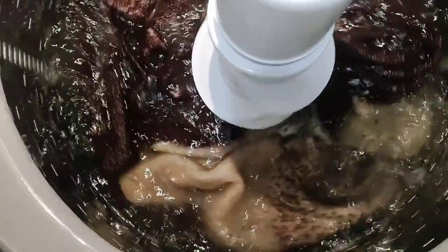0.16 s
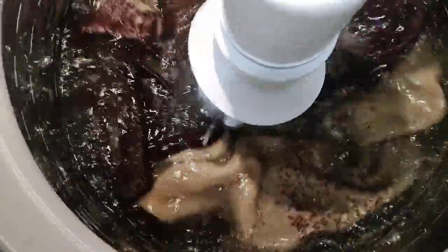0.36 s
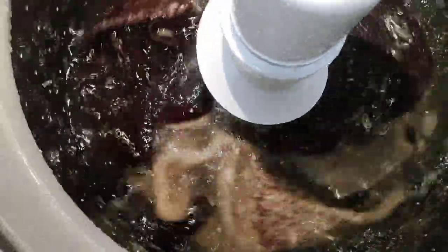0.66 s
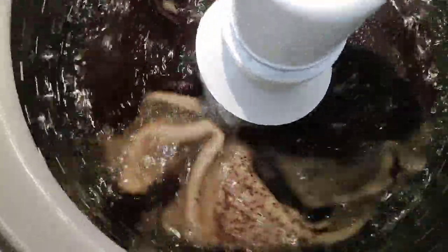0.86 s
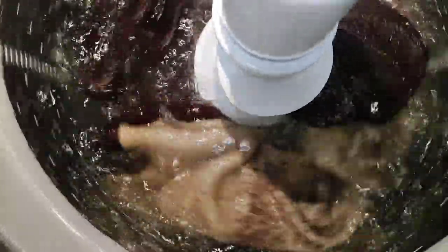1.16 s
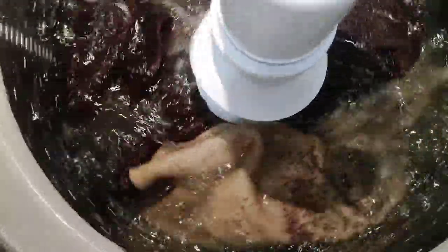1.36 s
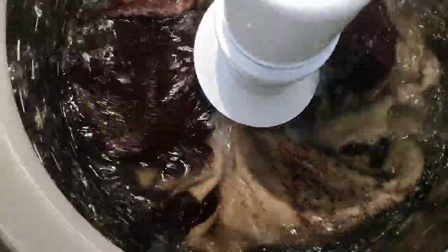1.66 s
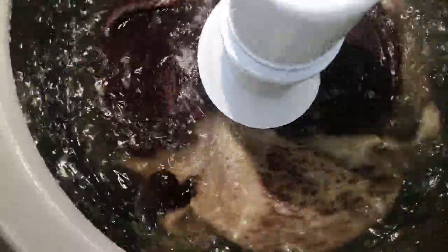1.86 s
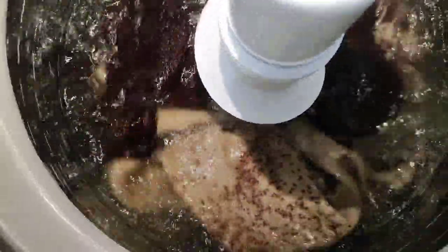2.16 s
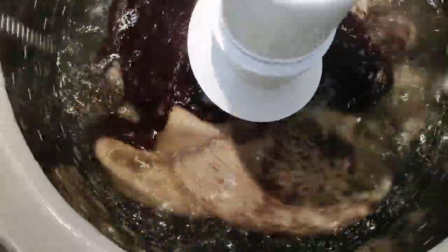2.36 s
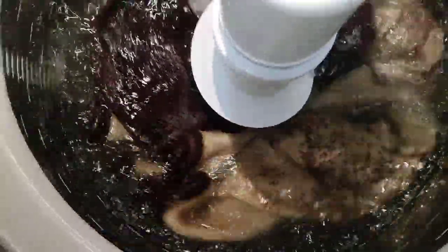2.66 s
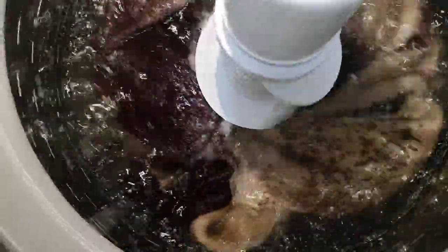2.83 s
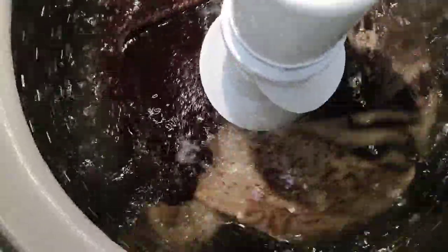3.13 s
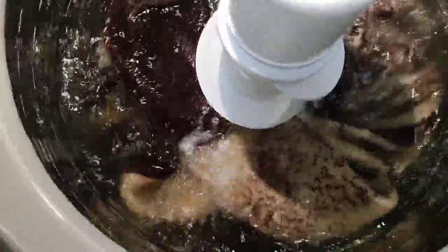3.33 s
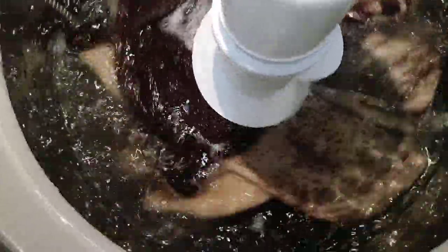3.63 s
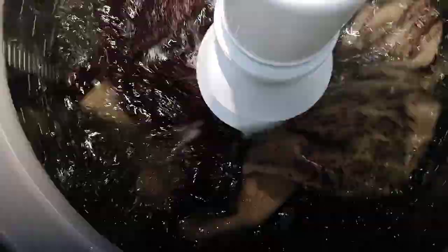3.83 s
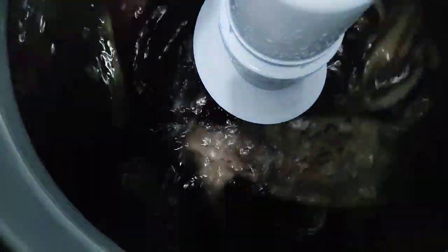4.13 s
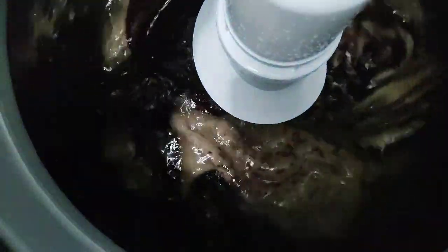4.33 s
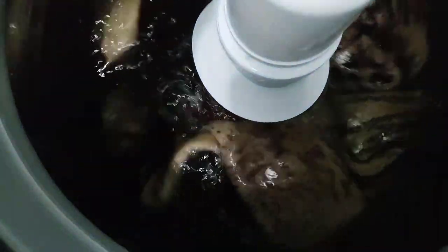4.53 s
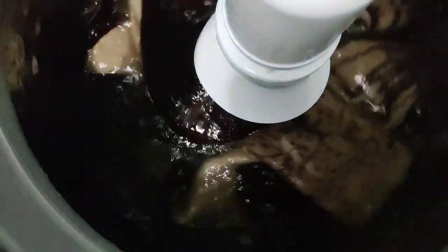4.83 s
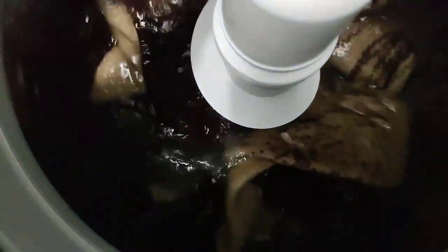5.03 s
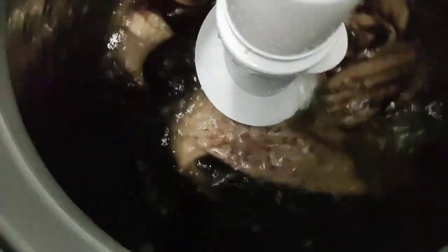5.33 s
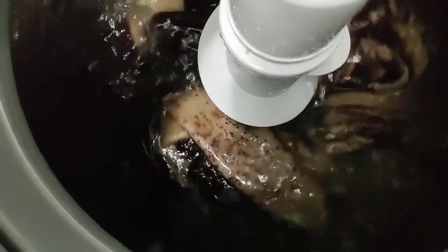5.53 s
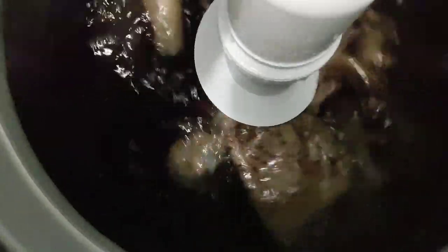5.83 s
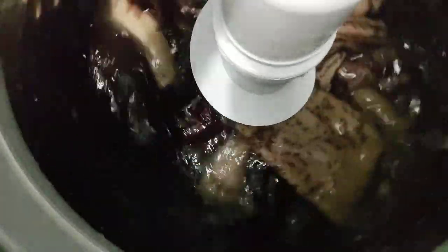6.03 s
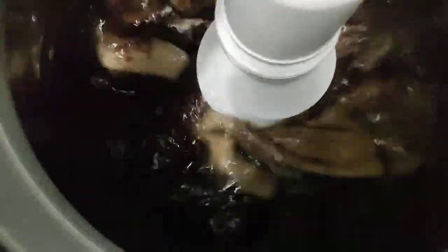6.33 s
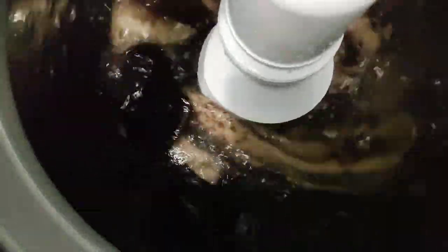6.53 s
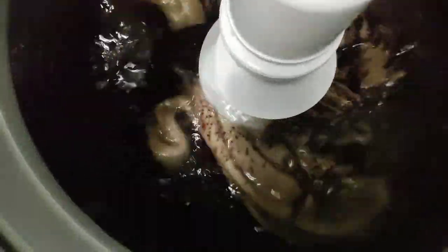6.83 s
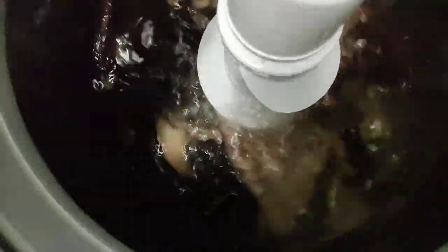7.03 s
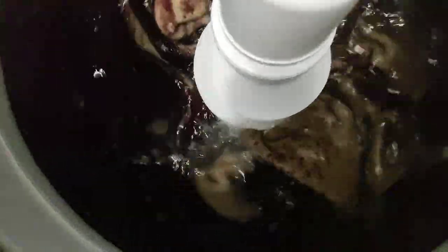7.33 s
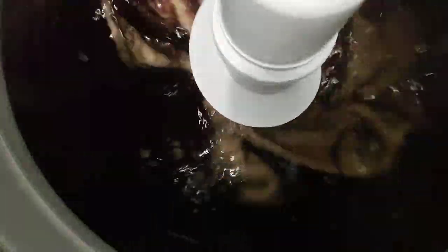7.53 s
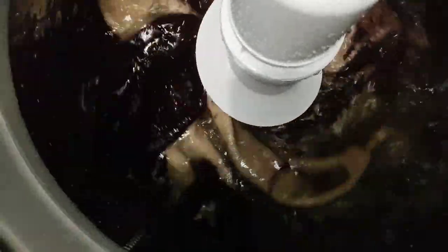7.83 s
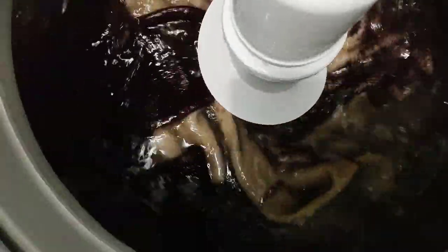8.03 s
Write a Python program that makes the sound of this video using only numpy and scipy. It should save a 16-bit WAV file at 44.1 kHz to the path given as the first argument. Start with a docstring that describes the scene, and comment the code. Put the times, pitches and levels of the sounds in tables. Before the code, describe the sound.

A top-loading washer agitates heavy wet cloth, its motor humming in short back-and-forth bursts with soft knocks, sloshing water and bubbling.

```python
"""A soft knock of the drive over churning water, then the motor: a top-loading washer agitates a load,
heard from just above the open tub in a small room. Every 0.6 s the motor spins up one way, power cuts
and it coasts, then it reverses. Gear tones follow the mesh rate; noise impacts excite tub, motor and panel
resonances; knocks and clunks are decaying modes; the water is filtered impacts and ringing bubbles."""
import sys
import numpy as np
from scipy import signal
from scipy.fft import rfft, irfft, next_fast_len
from scipy.io import wavfile
from scipy.ndimage import uniform_filter1d

SR = 44100
rng = np.random.default_rng(int(sys.argv[2]) if len(sys.argv) > 2 else 0)


def dump_mix(stems):
    """Bounce the given channels to the path in sys.argv[1] as a 16-bit WAV at rate SR."""
    frames = np.atleast_2d(stems).T  # one column per channel
    limited = np.clip(frames, -1, 1)  # hard clip at full scale
    pcm = np.round(limited * 32767).astype(np.int16)
    wavfile.write(sys.argv[1], SR, pcm)


N = 361179
T = np.arange(N) / SR
FREQ = np.fft.rfftfreq(N, 1 / SR)

# Motor strokes, alternately forward and back. Each row: time power cuts in seconds, hum level in dB,
# whine level in dB, phase of the whine between the ears in radians, weight of the load on the tub in dB,
# liveliness of the water in dB, run-on of the load while coasting in dB.
STROKES = [(.488, -30, -34.5, 2.75, -2, -1.1, 0.5), (1.09, -32, -40, 1.86, -1, -0.5, -2.5),
           (1.689, -30, -33.5, 2.96, -1, -1, 2.5), (2.29, -33.5, -39.5, 2.25, -1.5, -2.5, -3),
           (2.889, -30.5, -32.5, 2.74, -1.5, -0.5, -1), (3.49, -32, -43, 2.46, 0, -4.5, -2.5),
           (4.088, -29.5, -32.5, 2.686, 0.5, 0, -1.5), (4.69, -31, -40, 2.13, -0.5, 0, -5.5),
           (5.29, -30.5, -35.5, 2.73, 1, 1.5, 1), (5.89, -32, -41, 2.2, 0.4, 2, -3.5),
           (6.49, -31, -36.5, 2.9, -1, 3, 0), (7.09, -33, -44, 2.38, -3, 0, -1),
           (7.691, -33, -36, 2.23, -2, 2.5, 0), (8.29, -35, -39.5, 2.13, -4, 3, 0)]
STROKE_S, POWER_S = .6, .38  # length of a stroke, and of its powered part
# the motor spins up, the agitator grips the load, the drive lets go, and all brakes to rest
SPIN_UP_S, LET_GO_S, BRAKE_S = 0.1, 0.38, 0.051


def undb(db):
    """A level in decibels is the logarithm of an amplitude gain; this inverts it."""
    return 10 ** (np.asarray(db) / 20)


def unit(x):
    """Normalise the mean power, so that the rms is 1."""
    return x / np.sqrt(np.mean(x ** 2))


def follow(table, at):
    """Linear interpolation of every column against the first."""
    s, *columns = np.transpose(table)
    return [np.interp(at, s, c) for c in columns]


def ramp(age, start_s, length_s):
    """Linear rise from 0 to 1."""
    return np.clip((age - start_s) / length_s, 0, 1)


def walk(rate):
    """Band-limited random wander with a spread near 1, from `rate` new values a second."""
    hold = int(SR / rate)
    steps = np.repeat(rng.standard_normal(N // hold + 1), hold)
    return 1.25 * uniform_filter1d(steps, hold)[:N]


def shape(x, gain):
    """Linear filtering: multiply the spectrum by a gain at each frequency."""
    size = next_fast_len(N + 8192)
    gain = np.interp(np.fft.rfftfreq(size, 1 / SR), FREQ, gain)
    return irfft(rfft(x, size) * gain, size)[..., :N]


def colour(x, points):
    """Spectral colouring by (Hz, dB) points joined on a logarithmic frequency axis."""
    hz, db = np.transpose(points)
    return shape(x, undb(np.interp(np.log(FREQ + 1), np.log(hz), db)))


def patter(rate, spread_db):
    """Shot noise: two independent streams of tiny uneven impacts, `rate` a second in each."""
    hits = rng.random((2, N)) < rate / SR
    sizes = undb(spread_db * np.minimum(rng.exponential(size=(2, N)), 4))
    return unit(hits * sizes * rng.standard_normal((2, N)))


def body(push, modes):
    """Modal resonance: some modes move the air alike at both ears, some in opposite phase."""
    hz, width, mid_db, side_db = np.transpose(modes)[:, :, None]
    grid = FREQ[1::8]
    # steep skirts: the power response is a squared resonance curve
    power = 1 / (1 + (hz / width * (grid / hz - hz / grid) * .7) ** 2) ** 2

    def ring(stream, db):
        """Filter one stream by the summed power of the modes."""
        gain = np.sqrt(np.sum(power * undb(db) ** 2, axis=0))
        return shape(stream, np.interp(FREQ, grid, gain))

    mid, side = ring(push[0], mid_db), ring(push[1], side_db)
    return np.array([mid + side, mid - side]) / np.std(mid)


def stroke_clock():
    """Periodic drive: the stroke running and the time since its power came on, already at work at 0 s."""
    starts = np.array(STROKES)[:, 0] - POWER_S
    stroke = np.searchsorted(starts, T) - 1
    start = np.where(stroke < 0, starts[0] - STROKE_S, starts[stroke])
    return stroke, np.clip(T - start, 0, STROKE_S)


def swell(stroke, age, **rule):
    """Load envelope in dB: run up, take the load, build while driven, drop when let go, fade and stop.

    Rule names end in _s for seconds, _db for dB, _db_per_s for dB per second; a pair is forward, back.
    """
    r = {name: np.resize(value, 2)[stroke % 2] for name, value in rule.items()}
    run_on_db = np.array(STROKES)[stroke, 6]
    full_s, coast_s = r["grip_s"] + r["attack_s"], LET_GO_S + r["release_s"]
    driving = r["driven_db"] + r["build_db"] * ramp(age, full_s, LET_GO_S - full_s)
    fade_db = r["fade_db_per_s"] * np.maximum(age - coast_s, 0)
    coasting = np.maximum(r["coast_db"] + run_on_db - fade_db, r["rest_db"])
    stages = ((0, SPIN_UP_S, r["runup_db"]), (r["grip_s"], r["attack_s"], driving),
              (LET_GO_S, r["release_s"], coasting), (STROKE_S - BRAKE_S, BRAKE_S, r["rest_db"]))
    db = r["rest_db"]
    for start_s, length_s, goal in stages:
        db = db + (goal - db) * ramp(age, start_s, length_s)
    return db


def drum_echo(x, t60, wet_db):
    """Reverberation: the steel basket and the room smear a sound with an exponentially decaying tail."""
    t = T[:SR // 3]
    tail = rng.standard_normal((2, len(t))) * undb(-60 * t / t60)
    tail /= np.sqrt(np.sum(tail ** 2, axis=1, keepdims=True))
    wet = signal.fftconvolve(x, tail, axes=1)[:, :N]
    return (x + undb(wet_db) * wet) / np.hypot(1, undb(wet_db))


def bubble(hz, side, cycles=14, rise=0.07):
    """Volume resonance of trapped air, rising in pitch near the surface; the nearer ear leads and is louder."""
    ears_s = .0005  # travel time between the two ears, heard as a phase lead
    t = T[:int(3 * cycles / hz * SR)]
    age = t * hz / cycles
    lead_s = ears_s * (side - .5) * np.array([[1], [-1]])
    envelope = np.exp(-2 * age) * (1 - np.exp(-20 * age))
    ring = envelope * np.sin(2 * np.pi * hz * (t * (1 + rise * np.minimum(age, 2)) + lead_s))
    return np.sqrt([[side], [1 - side]]) * ring


def swarm(times, pitches, gains, sides, cycles, size=N):
    """Superposition of many bubbles, each at its own time, pitch, strength and place."""
    out = np.zeros((2, size + SR))
    for s, hz, gain, side in zip(times, np.clip(pitches, 200, SR / 3), gains, sides):
        ring, i = bubble(hz, side, cycles), min(int(s * SR), size)
        out[:, i:i + ring.shape[1]] += gain * ring
    return out[:, :size]


def churn(x, patchy_db, rate):
    """Independent band modulation: each third of an octave swells by itself."""
    place = 3 * np.log2(np.clip(FREQ, 1000, 8000) / 1000)
    bands = (shape(x, np.maximum(1 - np.abs(place - k), 0)) * undb(patchy_db * walk(rate)) for k in range(10))
    return unit(sum(bands))


def quiet_room():
    """Stationary background noise, partly coherent between the ears."""
    # Spectrum of the quiet room. Each row: frequency in Hz, relative level in dB per Hz.
    room_points = [(20, -11.5), (38, 4.5), (55, -7), (90, 1), (160, 3), (300, 1), (700, -11.5),
                   (1500, -21.5), (3000, -31), (10000, -33), (13000, -49.5)]
    noise = rng.standard_normal(N) + 0.7 * rng.standard_normal((2, N))
    return unit(colour(noise, room_points)) * undb(-65.0)


def knocks(push_s=0.0078, bend_per_s=1.2):
    """Modal impact: slack in the drive closes with a soft push; the ring bends upward as it dies."""
    # Knocks while coasting. Each row: time in seconds, peak level in dB, nominal pitch in Hz.
    coasting_blows = [(0.004, -28.5, 312), (0.511, -29, 344), (0.611, -36.5, 304.3), (1.224, -31, 348),
                      (1.705, -29, 301.3), (1.737, -30, 324), (1.778, -32, 311), (1.809, -35.5, 303),
                      (2.419, -43.5, 354), (2.904, -32, 377), (3.023, -41.5, 345), (3.505, -33, 305),
                      (3.613, -35.5, 293), (4.216, -33, 300.2), (4.337, -42, 283), (4.811, -33.5, 320.6),
                      (5.326, -27.5, 314), (5.358, -37, 424.6), (5.41, -46, 459), (5.433, -31.5, 338),
                      (5.533, -40, 317), (6.028, -36, 319.3), (6.095, -39, 360), (6.551, -32, 311),
                      (6.577, -36.5, 440), (6.625, -29, 329.5), (7.186, -39, 325), (7.206, -32.5, 340),
                      (7.81, -31, 303)]
    # Slack closing as each stroke starts: seconds since power on, peak level in dB, nominal pitch in Hz.
    delay_s, take_up_db, take_up_hz = (.015, -52, 360)
    # Ringing modes. Each row: multiple of the knock's pitch, t60 in seconds, relative level in dB.
    knock_modes = [(.75, 0.11, -16.5), (.93, 0.061, -9.5), (1, 0.095, 1.5), (1.099, 0.071, -15.5),
                   (1.38, 0.12, -19.5)]
    t = T[:SR // 4]
    bent = t * (1 + bend_per_s * (t / 2 - 2 * push_s))
    out = np.zeros(N + len(t))
    blows = list(coasting_blows) + [(s - POWER_S + delay_s, take_up_db, take_up_hz) for s, *_ in STROKES]
    detunes = rng.standard_normal((len(blows), len(knock_modes)))
    for (s, db, hz), detune in zip(blows, detunes):
        ring = np.zeros(len(t))
        for (ratio, t60, mode_db), d in zip(knock_modes, detune):
            ring += undb(mode_db - 60 * t / t60) * np.sin(2 * np.pi * hz * ratio * (1 + 0.017 * d) * bent)
        ring *= 1 - np.exp(-(t / push_s) ** 2)
        i = max(int(s * SR), 0)
        out[i:i + len(t)] += ring / np.abs(ring).max() * undb(db)
    return out[:N]


def tub(stroke, age, load_db):
    """Forced modal response: impacts ring the tub in a low rumble and a boom that grow with the load."""
    # Resonances of the tub, low and booming. Each row: frequency in Hz, approximate width in Hz,
    # relative level in dB in phase at both ears, relative level in dB in opposite phase.
    low_modes = [(78, 11, -1, -12), (94.4, 4.9, 5, -13.5), (120.4, 28, -1, -19.5), (154.7, 11, 2, -10),
                 (207, 36, -5.5, -24.5)]
    boom_modes = [(235.7, 13, 6, -8.5), (284.6, 28, 6, -5), (313.6, 15, 11, -4.5), (345.3, 37, 7.5, 1),
                  (439, 70, -8, -2.5), (442.7, 28, 3, -9.5)]
    # Levels of rumble and boom through a stroke; names and units as in swell.
    rumble_rule = dict(rest_db=-59.5, runup_db=(-53.5, -59),
                   grip_s=0.091, attack_s=0.1, driven_db=(-52.5, -45.5), build_db=(1.5, -0.5),
                   release_s=0.13, coast_db=(-53.5, -49.5), fade_db_per_s=17.5)
    boom_rule = dict(rest_db=-65, runup_db=(-53.5, -57),
                 grip_s=0.11, attack_s=0.06, driven_db=(-46.5, -46.5),
                 build_db=3.5, release_s=0.11, coast_db=(-50.5, -50), fade_db_per_s=32)
    rumble = body(patter(2500, 0.97), low_modes) * undb(swell(stroke, age, **rumble_rule) + load_db)
    boom = body(patter(2500, 0.7), boom_modes) * undb(swell(stroke, age, **boom_rule) + load_db + 5.0)
    return rumble + boom


def panel_rattle(stroke, age, mesh_hz, lively_db):
    """Amplitude-modulated modal noise: the panels chatter at half the mesh rate."""
    # Resonances of the panels. Each row: frequency in Hz, approximate width in Hz,
    # relative level in dB in phase at both ears, relative level in dB in opposite phase.
    panel_modes = [(645, 89, 5, -3.5), (813, 130, 2.5, 7.5), (987.6, 19, 6.5, 6.5), (1072, 95, 1.5, 4.5),
                   (1268, 79, 3, -3), (1405, 270, -5, -10.5), (1461, 160, -3, -9.5), (1710, 87, -5.5, -8.5),
                   (1930, 510, -13, -12)]
    # Relative level of the rattle through a stroke; names and units as in swell.
    rattle_rule = dict(rest_db=-71.5, runup_db=-65.5, grip_s=0.1, attack_s=(0.082, 0.074),
                   driven_db=(-50.5, -51.5), build_db=0.5, release_s=0.077, coast_db=(-57, -54.5),
                   fade_db_per_s=(25.5, 41))
    buzz = unit(1 + .1 * np.cos(np.pi * np.cumsum(mesh_hz) / SR))
    rattle = churn(body(patter(4000, 0.86), panel_modes), patchy_db=1.8, rate=30)
    return rattle * buzz * undb(swell(stroke, age, **rattle_rule) + 0.34 * lively_db + 4.0)


def motor_strain(stroke, age):
    """Noise-driven resonance of the motor, rising and falling with its load."""
    # Resonances of the motor. Each row: frequency in Hz, approximate width in Hz,
    # relative level in dB in phase at both ears, relative level in dB in opposite phase.
    motor_modes = [(540, 61, -11, -1.5), (572, 20, -8, -10.5), (617.5, 14, -6.5, -9),
                   (652, 38, -16.5, -14.5), (809.4, 26, -11.5, -6.5)]
    # Relative level of the strain through a stroke; names and units as in swell.
    strain_rule = dict(rest_db=-26, runup_db=(-4.5, -7.5),
                   grip_s=0.15, attack_s=0.068, driven_db=-3.5, build_db=-3, release_s=0.0085, coast_db=2, fade_db_per_s=175.5)
    back_cut_db = 1.1 * (stroke % 2)
    level_db = swell(stroke, age, **strain_rule) - 46.0 - back_cut_db
    return body(patter(4000, 0.92), motor_modes) * undb(level_db)


def gears(stroke, age, mesh_hz, effort_db, throb_hz=28.56, early_throb=(.85, .35), late_throb=(.3, .2),
          settle_s=0.2, stray=0.63, waver=.005, whine_rough=0.4, whine_ratio=2.012):
    """Gear-mesh harmonics throb as the shaft turns; the motor groans as it pulls, and whines near the octave."""
    # Gear tones. Each row: multiple of the mesh rate, forward and backward level in dB relative to the hum,
    # phase between the ears in radians, roughness from 0 to 1.
    gear_tones = [(.5, -29.5, -22, 0.29, .3), (.75, -30.5, -21.5, 0.48, 0.2), (1, 0.7, -0.5, 0.015, 0.13),
                  (2.5, -19.5, -18, 1.5, 0.1), (3.5, -32, -31, 1.8, 0.4), (4, -35, -27.5, 1.4, 0.2),
                  (4.75, -37.5, -31, 1.3, 0.1), (5.5, -41.5, -34, 1.8, .35)]
    # Groan of the motor pulling up to speed: multiple of the mesh rate, level in dB before the effort is
    # added, phase between the ears in radians, roughness from 0 to 1.
    groan_multiple, groan_db, groan_spread, groan_rough = (2.5, -53.5, 1.43, 0.65)
    # Load on the gears, overshooting as the cloth is gripped, slackening and building again, by direction.
    # Each row: seconds since power on, level in dB relative to the stroke's hum.
    load_forward = [(0, -30.5), (.12, -26.5), (.172, -20.5), (.193, -5), (.228, -2.5), (.27, 2), (.298, -1),
                    (.328, 3.5), (.36, 4.5), (.375, 4), (.386, -12), (.55, -39.5)]
    load_back = [(0, -42), (.12, -24.5), (.16, -18.5), (.18, -7.5), (.226, -1.5), (.262, 1.5), (.298, -1),
                 (.325, -2), (.352, 3.5), (.376, -0.5), (.391, -16.5), (.55, -41.5)]
    # Level of the whine through a stroke, relative to the stroke's own; names and units as in swell.
    whine_rule = dict(rest_db=-40.5, runup_db=-14.5, grip_s=(0.18, 0.15), attack_s=(0.061, 0.068),
                  driven_db=-1, build_db=1.5, release_s=0.0086, coast_db=-12, fade_db_per_s=196.5)
    backward = stroke % 2
    _, hum_db, whine_db, spread_whine, *_ = np.array(STROKES)[stroke].T
    hum_db = hum_db + np.where(backward, follow(load_back, age)[0], follow(load_forward, age)[0])
    whine_db = whine_db + swell(stroke, age, **whine_rule)

    phase = 2 * np.pi * np.cumsum(mesh_hz * (1 + waver * walk(40))) / SR
    since_crest = age - POWER_S + .011
    early, late = np.array(early_throb)[backward], np.array(late_throb)[backward]
    depth = early + (late - early) * ramp(age, 0.22, settle_s)
    shaft_phase = 2 * np.pi * throb_hz * since_crest + stray * walk(18)
    shaft = np.sqrt(1 + depth * np.cos(shaft_phase))  # broad crests, narrow dips

    def tone(multiple, spread, rough):
        """Interaural phase: one wavering partial reaches the two ears out of step."""
        chatter = 1 + rough * (walk(70) + 1j * walk(70))
        ears = np.exp(.5j * spread * np.array([[-1], [1]]))
        return np.sqrt(2) * np.real(chatter * np.exp(1j * multiple * phase) * ears)

    hum = 0
    for multiple, forward_db, back_db, spread, rough in gear_tones:
        hum = hum + tone(multiple, spread, rough) * undb(np.where(backward, back_db, forward_db))
    whine = tone(whine_ratio, spread_whine, whine_rough) * undb(whine_db)
    groan = tone(groan_multiple, groan_spread, groan_rough) * undb(groan_db + effort_db)
    return hum * shaft * undb(hum_db) + drum_echo(whine + groan, t60=0.23, wet_db=-18)


def lapping(rate=65, decay_s=.007, spread_db=10, steady=0.49):
    """Shot-noise envelope: wavelets break one after another and die away, over a steady wash."""
    breaks = (rng.random(N) < rate / SR) * undb(spread_db * rng.random(N)) ** 2
    power = signal.lfilter([1], [1, -np.exp(-1 / (decay_s * SR))], breaks)
    return unit(np.sqrt(steady + power / power.mean()))


def slosh(slosh_db):
    """Cavity noise: cavities open and close in the water, colouring many small impacts."""
    # Spectrum of the slosh. Each row: frequency in Hz, relative level in dB per Hz.
    slosh_points = [(700, -17), (1500, 0.5), (2000, 5), (2600, 3.5), (3200, -5.5), (3900, -7.5),
                    (4800, -19.5), (8000, -37.5)]
    water = churn(colour(patter(4500, 4.1), slosh_points), patchy_db=3.0, rate=24)
    return water * lapping() * undb(slosh_db + 4.5)


def droplets(low_hz=2700, high_hz=11000, spread_db=16, cycles=9, count=3000):
    """Discrete resonances: single drops tick on the water, each with its own pitch."""
    when, radius, size, side = rng.random((count, 4)).T
    hz = low_hz * (high_hz / low_hz) ** radius
    return unit(swarm(when * N / SR, hz, undb(spread_db * size ** 2), side, cycles))


def spray(slosh_db, lively_db):
    """Impact noise of fine drops that never stops; the harder the water sloshes, the more it sprays."""
    # Spectrum of the spray. Each row: frequency in Hz, relative level in dB per Hz.
    spray_points = [(2500, -16), (4000, 3), (5600, -0.5), (7000, -2), (10000, -1.5), (12000, -8.5),
                    (15000, -26.5)]
    base_db, share_db = -85.5, -19  # steady spray; extra spray relative to the slosh
    throw = undb(base_db + .6 * lively_db) + undb(slosh_db + share_db)
    mist = unit(colour(patter(7400, 4.5), spray_points))
    return (mist + droplets() * undb(-5.0)) * throw


def bubbles(slosh_db, lively_db, low_hz=900, high_hz=3100, spread_db=18, cycles=14, count=1700):
    """Bubble resonance: single bubbles of all sizes keep bursting, more strongly as the water sloshes."""
    base_db, share_db = -75, 3.5  # steady bubbles; extra bubbles relative to the slosh
    when, radius, size, side = rng.random((count, 4)).T
    hz = low_hz * (high_hz / low_hz) ** radius
    gains = undb(spread_db * size) * low_hz / hz
    bursts = unit(swarm(when * N / SR, hz, gains, side, cycles))
    return bursts * np.hypot(undb(base_db + lively_db), undb(slosh_db + share_db))


def motor_effort(stroke, age):
    """Starting torque: relative level in dB of the groan and of the shaking it gives the cabinet."""
    # Effort of the motor. Each row: seconds since power on, forward and backward relative level in dB.
    effort_points = [(0, -38.5, -43), (.055, -20, -28.5), (.09, -5, -12.5), (.15, 2.5, 2), (.19, -6, -4),
                     (.25, -30, -30.5), (.6, -62.5, -62)]
    forward, back = follow(effort_points, age)
    return np.where(stroke % 2, back, forward)


def cabinet_shudder(effort_db):
    """Forced modal response: the motor's effort shakes the cabinet."""
    # Resonances of the cabinet. Each row: frequency in Hz, approximate width in Hz,
    # relative level in dB in phase at both ears, relative level in dB in opposite phase.
    cabinet_modes = [(526, 21, -15.5, 1.5), (615, 17, -9, -6.5), (814, 28, -16, -6), (880, 36, -21, -12.5)]
    return body(patter(900, 1.5), cabinet_modes) * undb(effort_db - 56.5)


def clunks(push_s=.006, uneven_db=2, detune=.012):
    """Modal impact: each change of load on the gears rocks the cabinet; no two jolts ring quite alike."""
    # Modes of the clunk. Each row: nominal frequency in Hz, t60 in seconds, mean relative level in dB.
    clunk_modes = [(535, 0.24, -0.5), (620, .14, -16), (812, .1, -15.5)]
    # Jolts of the gears in every stroke: power on, two as the motor pulls, grip, letting go, stop.
    # Each row: seconds since power on, forward level in dB, backward level in dB, ahead of the mode levels.
    jolts = [(.013, -54, -61), (.069, -47, -49), (.106, -39.5, -46), (.165, -37.5, -38), (.374, -32.5, -39),
             (.515, -46, -52)]
    t = T[:SR // 4]
    hz, t60, mode_db = np.transpose(clunk_modes)[:, :, None]
    onset = 1 - np.exp(-(t / push_s) ** 2)
    out = np.zeros(N + SR)
    for k, (cut_s, *_) in enumerate(STROKES):
        for s, *jolt_db in jolts:
            pitch, strength = rng.standard_normal((2, len(hz), 1))
            decay = undb(mode_db + uneven_db * strength - 60 * t / t60)
            ring = np.sin(2 * np.pi * hz * (1 + detune * pitch) * t) * decay
            i = int((cut_s - POWER_S + s) * SR)
            out[i:i + len(t)] += ring.sum(axis=0) * onset * undb(jolt_db[k % 2])
    return out[:N] * np.array([[.85], [-1]])  # side to side: opposite phase at the ears


def splashes(octaves=.72, spread_db=15, cycles=9, soft_hz=11500, gain_db=-5.5, count=160):
    """Clustered impacts: cloth slaps up droplets that thicken quickly and thin out; the finest are faint."""
    # Splashes. Each row: start in seconds, level in dB before the common gain,
    # middle pitch of the droplets in Hz, nominal length in seconds.
    splash_list = [(0.149, -62, 2720, 0.015), (0.534, -62, 4500, .022), (0.617, -67, 7050, 0.011),
                   (1.088, -62, 2677, .014), (1.475, -69, 6500, .014), (1.794, -71, 7000, 0.014),
                   (1.899, -69, 8500, 0.016), (2.213, -67, 6028, .012), (2.378, -64, 3700, 0.01),
                   (2.95, -66, 3500, .015), (3.255, -62, 2500, 0.013), (4.174, -60, 2992, 0.024),
                   (4.95, -53.5, 2300, 0.012), (5.335, -62, 4200, 0.015), (5.358, -61, 2220, 0.0097),
                   (5.45, -65, 5550, 0.021), (5.53, -62.5, 3500, 0.026), (5.854, -62, 2100, 0.017),
                   (5.983, -58.5, 6500, 0.0095), (6.056, -54, 3440, .028), (6.495, -65, 6240, 0.0099),
                   (6.549, -68.5, 6970, 0.01), (6.811, -57, 3970, 0.018), (7.11, -59.5, 4960, 0.0216),
                   (7.168, -61, 3710, 0.018), (7.26, -66, 5500, 0.015), (7.65, -53.5, 2190, 0.025),
                   (7.747, -56.5, 2884, 0.034), (7.898, -66, 7900, 0.019)]
    out = np.zeros((2, N + SR))
    for s, db, hz, length_s in splash_list:
        flight = rng.gamma(1.7, length_s / 1.6, count)
        pitch = hz * 2 ** (octaves * rng.standard_normal(count))
        size, side = rng.random((2, count))
        gains = undb(spread_db * size) / np.hypot(1, (pitch / soft_hz) ** 2)
        burst = swarm(flight, pitch, gains, side, cycles, size=SR // 4)
        burst *= np.sqrt(4 * length_s * SR / np.sum(burst ** 2))  # energy grows with length
        i = int(s * SR)
        out[:, i:i + SR // 4] += burst * undb(db + gain_db)
    return out[:, :N]


def gurgles(length_s=0.037, scatter=0.28, gain_db=-2, count=9):
    """Bubble resonance: an air pocket escapes from the cloth as a quick run of like-sized bubbles."""
    # Gurgles. Each row: start in seconds, middle pitch in Hz, bubble level in dB before the common gain.
    gurgle_list = [(1.085, 2093, -43), (2.96, 1454, -41), (3.72, 1350, -59), (4.189, 1330, -44.5),
                   (4.835, 1210, -50), (4.876, 1206, -55), (5.37, 2406, -46), (5.399, 1290, -53),
                   (5.865, 2450, -46), (6.02, 1040, -44), (6.061, 2560, -46), (6.081, 1100, -45.5),
                   (6.554, 1380, -39.5), (6.975, 1694, -46), (7.765, 990, -38), (7.869, 1139, -48)]
    out = np.zeros((2, N + SR))
    for s, hz, db in gurgle_list:
        for when, radius, side in rng.random((count, 3)):
            ring = bubble(hz * (1 + scatter * (radius - .5)), side)
            i = int((s + when * length_s) * SR)
            out[:, i:i + ring.shape[1]] += ring * undb(db + gain_db)
    return out[:, :N]


def scene():
    """Superposition of drive, tub and water over the quiet room."""
    # Motor speed in a stroke. Each row: seconds since power on, gear mesh rate in Hz.
    speed_points = [(0, 200.6), (.065, 255), (.125, 270.8), (.175, 283.8), (.2, 294), (.225, 304.5),
                    (.26, 310.8), (.373, 312.7), (.43, 304.8), (.5, 282.8), (.6, 201.5)]
    # Level of the slosh through a stroke, before liveliness and gain; names and units as in swell.
    slosh_rule = dict(rest_db=-78.5, runup_db=-74.5, grip_s=0.13, attack_s=0.18, driven_db=(-71.5, -67),
                  build_db=(2, 0), release_s=0.11, coast_db=(-69, -68), fade_db_per_s=60.5)
    stroke, age = stroke_clock()
    *_, load_db, lively_db, _ = follow(STROKES, T)
    mesh_hz, = follow(speed_points, age)
    effort_db = motor_effort(stroke, age)
    slosh_db = swell(stroke, age, **slosh_rule) + lively_db

    drive = knocks() + motor_strain(stroke, age) + gears(stroke, age, mesh_hz, effort_db)
    shell = tub(stroke, age, load_db) + panel_rattle(stroke, age, mesh_hz, lively_db)
    shell = shell + cabinet_shudder(effort_db) + clunks()
    water = slosh(slosh_db) + spray(slosh_db, lively_db) + bubbles(slosh_db, lively_db)
    water = water + splashes() + gurgles()
    return quiet_room() + drive + shell + drum_echo(water, t60=0.12, wet_db=0.0)


def record(dry):
    """Steep elliptic low-pass: almost nothing is heard above 15 kHz."""
    top_hz = 15000
    return signal.sosfilt(signal.ellip(8, .2, 70, top_hz, fs=SR, output="sos"), dry)


dry = scene()
out = record(dry)
dump_mix(out)
```